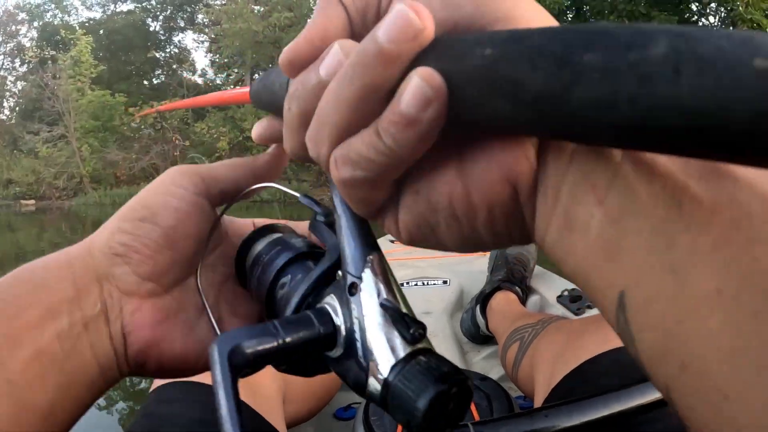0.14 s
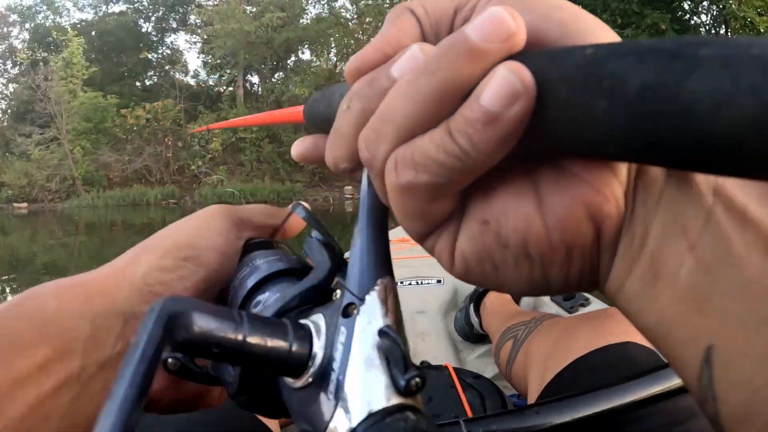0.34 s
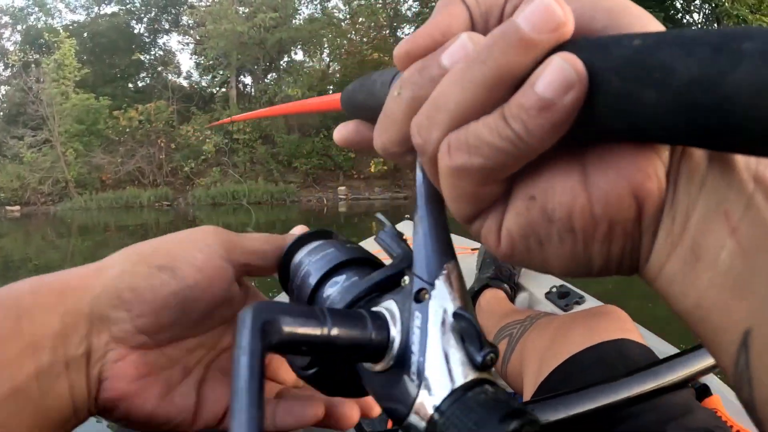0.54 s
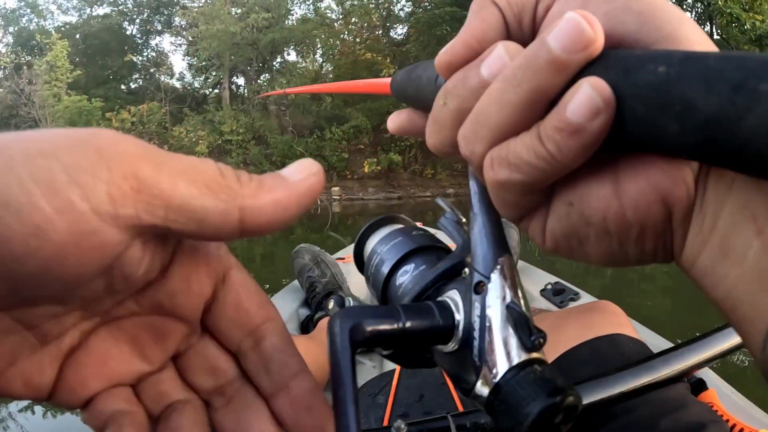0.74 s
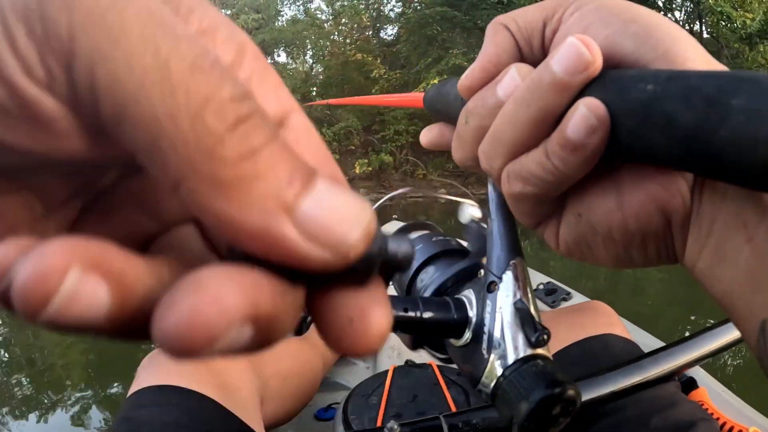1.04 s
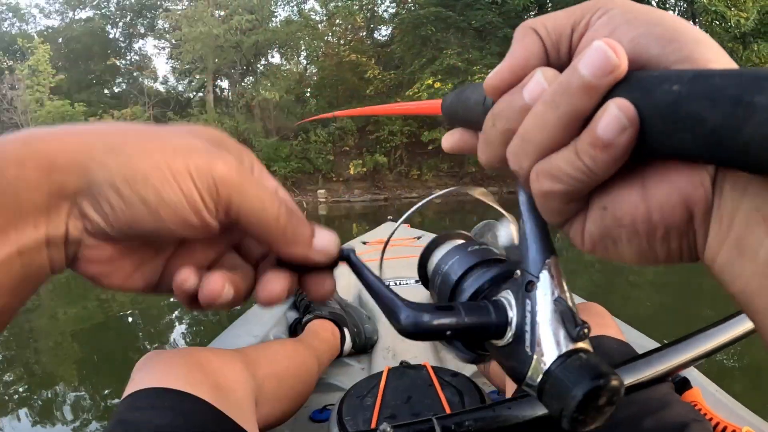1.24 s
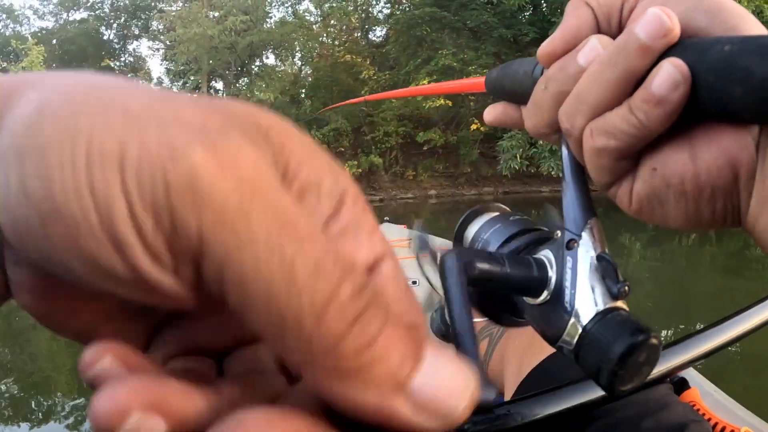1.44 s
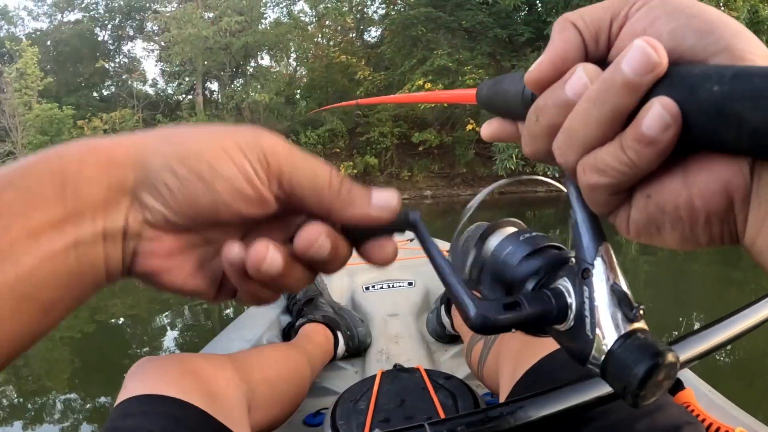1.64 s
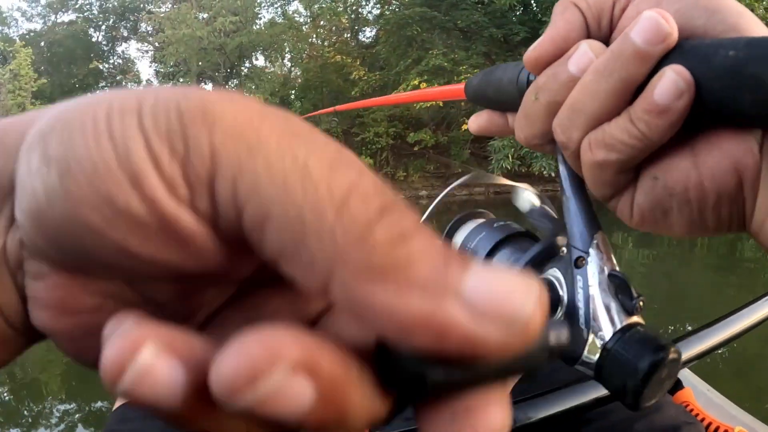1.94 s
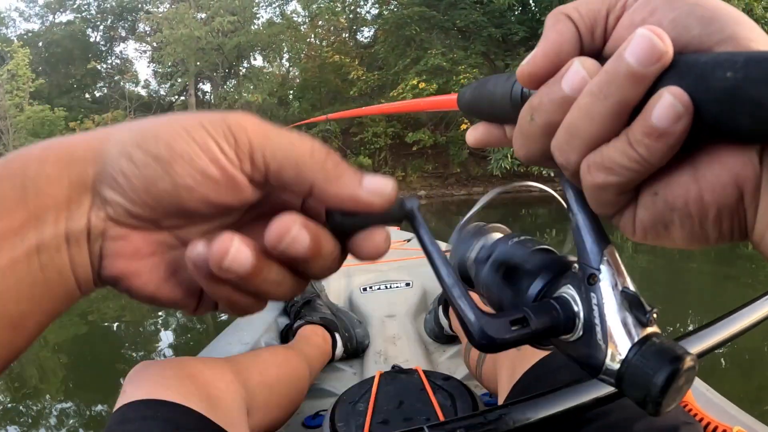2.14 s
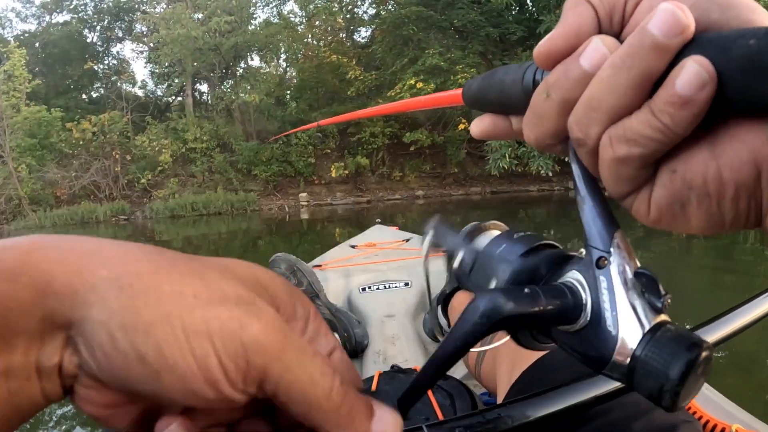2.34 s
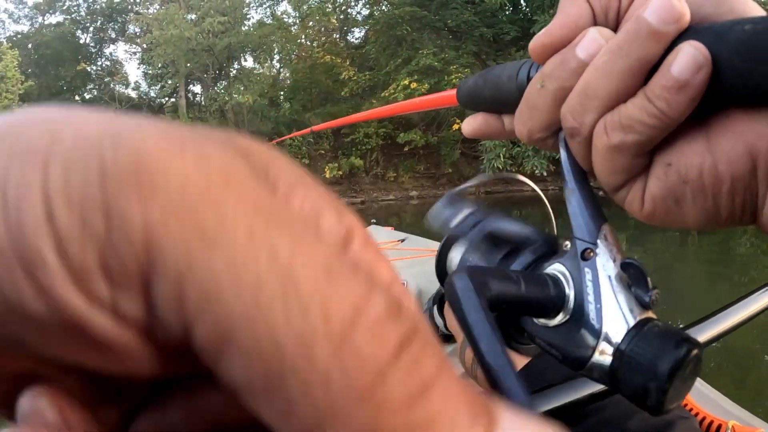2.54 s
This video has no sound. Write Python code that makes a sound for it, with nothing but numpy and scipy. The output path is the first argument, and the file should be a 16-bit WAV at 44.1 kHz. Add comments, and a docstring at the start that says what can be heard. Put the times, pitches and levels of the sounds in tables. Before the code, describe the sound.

A small fishing reel, close up outdoors on a little boat: a cluster of sharp clicks as the bail flips shut, a short lull, then soft gear whirring in uneven turns over low handling rumble.

```python
"""A spinning reel close by on a small boat: a hand flips the wire bail shut, then cranks the handle.
Faint air (stereo noise) lasts throughout; an insect (pulses of narrow noise) chirps at the start.
Then contacts set the modes of the reel clicking, and soft thuds set those of the hull ringing.
Later the gears (dense random touches on resonances) whir and rub in uneven swells.
Handling, as low noise of changing level, thrums and rumbles from beginning to end."""
import sys
import numpy as np
from scipy import signal
from scipy.fft import rfft, irfft
from scipy.io import wavfile

SR = 44100
rng = np.random.default_rng(int(sys.argv[2]) if len(sys.argv) > 2 else 0)


def master(y):
    """Save y as 16-bit WAV."""
    cut = np.clip(np.atleast_2d(y).T, -1, 1)
    pcm = np.round(cut * 32767)  # scale
    wavfile.write(sys.argv[1], SR, pcm.astype(np.int16))


def field_ratio(decibels):
    """Amplitude ratio for a level in dB (20 dB per decade); scalars and array-likes work."""
    return 10 ** (np.asarray(decibels, dtype=float) / 20)


N = 119070   # samples, 2.7 s

# Spectra of the air: (frequency [Hz], relative density [dB per Hz]), (frequency [Hz], left-right [dB]),
# (frequency [Hz], left-right correlation [0..1])
AIR_SPECTRUM = [(300, -5.5), (412, -17), (486, -7.5), (713, -66), (946, -1.5), (1340, -40), (1580, -20),
                (1840, -26.5), (3950, -29.5), (10700, -21), (14700, -20.5)]
AIR_BALANCE = [(300, 0), (3000, 0.5), (12000, 4.5)]
AIR_CORRELATION = [(300, 0.26), (3000, 0.16), (12000, 0.52)]
AIR_RMS_DB = -52

# Insect pulses: (time [s], level [dB])
INSECT_PULSES = [(.024, -56), (.06, -60), (.104, -58.5), (0.136, -54)]
# pitch, standard deviation of the bell-shaped pulse, decay time by 60 dB
CHIRP_HZ, CHIRP_WIDTH_S, CHIRP_T60_S = 3000, 0.008, 0.015

# Handling of the boat and camera: (time [s], hull thrum level [dB], deep rumble level [dB])
HANDLING_LEVELS = [(0,-53.5,-41.5),(.16,-47.5,-49),(.22,-36,-43.5),(.44,-45.5,-46),(.5,-41,-50),(.6,-44,-36.5),(.68,-45.5,-48.5),(.8,-50,-52.5),(.9,-58,-51),(.99,-49,-46.5),(1.1,-50,-46),(1.33,-49,-52),
                   (1.46,-38,-48),(1.57,-41.5,-46.5),(1.65,-44,-38),(1.82,-42.5,-39),(1.9,-43.5,-41.5),(2.04,-49.5,-49),(2.25,-51,-45),(2.33,-50.5,-52.5),(2.42,-49,-50),(2.55,-47,-58),(2.7,-45,-42.5)]
# Spectra of both noises: (frequency [Hz], relative density [dB per Hz])
THRUM_SPECTRUM = [(53, -36), (90, -24), (108, -6.5), (177, 5.5), (396, -15), (450, -15.5), (484, -14.5),
                  (800, -20)]
RUMBLE_SPECTRUM = [(8.8, -29), (15, 8.5), (110, -8)]
# Stereo of both noises: (frequency [Hz], left-right correlation [0..1]), (frequency [Hz], left-right [dB])
HULL_CORRELATION = [(30, 0.95), (150, 0.89), (500, 0.66)]
HULL_BALANCE = [(30, 0.11), (200, -1.7)]

# Thuds passed on to the hull: (time [s], relative level [dB], centre frequency [Hz])
HULL_THUDS = [(0.202, -25.5, 132), (.378, -24.5, 327), (0.512, -21, 170), (0.548, -19, 144.5),
              (0.587, -30.5, 470), (.597, -28, 113), (0.979, -26.5, 127), (.977, -34.5, 444),
              (1.425, -34, 460), (1.454, -25, 370), (1.64, -29.5, 245), (1.8, -28.5, 202)]
# Modes of the hull: (frequency [Hz], relative level [dB], decay time by 60 dB [s])
HULL_MODES = [(94.5, 7.5, 0.057), (170, -4.5, 0.07), (260, -3, 0.03), (370, 3.5, 0.023), (509, -1, 0.055),
              (606, 2.5, 0.081)]
THUD_OCTAVES, THUD_SMOOTHING_S = 0.32, 0.00032   # spread over the modes; time constant

# Modes of the reel: (frequency [Hz], relative level [dB], decay time by 60 dB [s])
REEL_MODES = [(1060, 9, 0.027), (1269.7, 3, 0.021), (1526, 7, 0.021), (1700, 6, 0.012), (1930, 6.5, 0.019),
              (2194, 3, 0.017), (2828, 3.5, 0.0053), (3354, -5.5, 0.0076), (3860, -3.5, 0.0048),
              (4580, -0.5, 0.0056), (4900, 0.5, 0.0091), (5570, 1.5, 0.0073), (6300, 11.5, 0.0018),
              (7180, 3, 0.0043), (8870, 2, 0.0017), (10210, 1, 0.014), (12100, 16.5, 0.0011)]
# Contacts on the reel: (time [s], relative knock level [dB], knock centre [Hz],
# relative tick level [dB], tick centre [Hz])
REEL_CONTACTS = [(0.2499,-33,1450,-23,7040),(0.253,-28.5,1230,-34.5,5040),(0.262,-26,1360,-58,5820),
                 (.304,-27.5,1550,-37.5,6740),(0.333,-32.5,1180,-32.5,3900),(0.3751,-6.5,1395,-33,4200),(0.3781,-37,1360,-13,5070),(0.3797,-39,1500,-15,3460),(0.4301,-5.5,1680,-24.5,5540),(0.462,-25,1530,-50,4750),
                 (0.508,-11,1470,-21.5,3200),(.519,-42.5,1500,-25,3660),(0.532,-27,1470,-48,4840),(0.5428,-11.5,1580,-23,6000),(0.5445,-22,1430,-18.5,6400),(0.549,-22,1700,-20,4200),
                 (0.587,-13.5,1000,-24.5,2850),(.591,-48,1900,-21.5,3000),(0.5931,-20,1140,-24.5,5000),(0.5966,-24,1060,-19,6150),(0.6654,-43,1810,-37.5,5500),
                 (0.686,-17,1494,-14.5,5400),(0.691,-18.5,1440,-33,2400),(0.967,-27,1210,-32,4200),(0.9756,-16.5,1850,-24.5,4650),(0.978,-25,1160,-29.5,3000),(1.031,-30.5,1480,-49,5460),(1.061,-42.5,1150,-38,3500),
                 (1.356,-62,1600,-30,3970),(1.426,-27,1310,-38,3600),(1.446,-27,1310,-38,4700),(1.454,-27,1230,-36,3000),(1.477,-23,1700,-38,3900),(1.498,-33,1740,-32,3640),
                 (1.531,-35,1690,-37.5,4250),(1.71,-37,1370,-31.5,3740),(1.796,-23,1300,-33.5,3750),(1.868,-40,1950,-40,4400),
                 (2.186,-24.5,1360,-40.5,4400),(2.395,-26,1340,-51,4270),(2.43,-19,1470,-33,4670),(2.445,-46,1570,-36.5,4830),(2.461,-23.5,1370,-64,3860)]
KNOCK_OCTAVES, TICK_OCTAVES = 0.2, 0.44   # spread of a contact over the modes
KNOCK_GAIN_DB, TICK_GAIN_DB = -7.5, -2
BURST_S = 0.0012   # longest burst of touches in a tick

# Gear whir in the body: (time [s], level [dB], singing pitch [Hz])
WHIR_COURSE = [(0,-57,1400),(.17,-65,1290),(.3,-56.5,1460),(.45,-46.5,1530),(.55,-43.5,1530),(.7,-47.5,1530),(.76,-70,1330),(.95,-57,1530),(1.0,-54,1380),(1.15,-58.5,1320),(1.3,-52.5,1407),
               (1.46,-38.5,1300),(1.58,-47.5,1300),(1.75,-43.5,1300),(1.85,-45.5,1230),(1.92,-38.5,1830),(2.05,-45.5,1590),(2.2,-38,1710),(2.28,-52,1600),(2.4,-35.5,1950),(2.48,-47.5,1720),(2.55,-53.5,1480),(2.7,-49,1230)]
# Bright rub of line and bearings: (time [s], level [dB], centre frequency [Hz])
RUB_COURSE = [(0,-61.5,4840),(.43,-57,5370),(.47,-47.5,5000),(.55,-40.5,5400),(.57,-54.5,5670),(.64,-48,5000),(.71,-44,7300),(.74,-78.5,5950),(.96,-66,5000),(1.01,-53.5,5000),
              (1.07,-55,5000),(1.1,-65.5,5000),(1.3,-56,4470),(1.45,-46,4080),(1.6,-51.5,4000),(1.72,-47.5,3950),(1.77,-54,4300),(1.9,-44,4500),(1.932,-40,4440),(1.94,-30.5,4250),(1.962,-39,4250),(1.975,-48,4230),
              (2.04,-47,4230),(2.12,-52.5,4180),(2.148,-45,4330),(2.156,-33,4480),(2.175,-48.5,4440),(2.218,-52,3720),(2.228,-40.5,3500),(2.27,-58,4860),(2.33,-53,4330),(2.38,-41,4230),(2.5,-47.5,4330),(2.54,-52.5,4460),(2.7,-54,4040)]
# Touches: mean rate, scale of the random sizes, spread over the resonances, ringing by 60 dB in cycles
TEETH_PER_S, TEETH_SIZE_DB, WHIR_OCTAVES, WHIR_CYCLES = 2000, 3.5, 0.34, 24.0
RUB_PER_S, RUB_SIZE_DB, RUB_OCTAVES, RUB_CYCLES = 4000, 3.5, 0.48, 21.0
# broad whir centre; singing of the body modes, in level relative to the broad whir
WHIR_HZ, SING_DB, SING_OCTAVES, SING_CYCLES = 1600, -3, 0.09, 50.0
WHIR_FLUTTER_DB, RUB_FLUTTER_DB, COLOUR_WANDER_DB = 1.3, 2.0, 3.0   # standard deviations
# airy top: centre, level while the rub is at its mean dB, share of the rub's dB swing
SHEEN_HZ, SHEEN_DB, SHEEN_FOLLOWS = 7400, -59.5, 0.5

# Difference of the two ports for the reel: (frequency [Hz], left-right [dB], lead of the left [rad])
PORT_DIFFERENCE = [(1000, -3.5, -0.57), (1820, -4.5, -1.06), (3000, -3.5, -0.58), (5000, -2.5, -0.73),
                   (9900, -1, -0.86)]
# Further balance as the reel moves: (time [s], left-right [dB])
REEL_BALANCE = [(0, 5.5), (.7, 3), (1.3, 3.5), (1.6, 2), (2.7, 2)]
SCATTER_DB = -15   # energy of the scatter relative to the direct path
REEL_LOW_CUT_HZ, TOP_CUT_HZ = 664, 12570


def rms_one(x):
    """Normalisation: a signal divided by its root mean square has rms 1."""
    return x / np.sqrt(np.mean(x ** 2) + 1e-20)


def in_time(rows):
    """Linear interpolation: each column of a time table becomes one value per sample."""
    times, *columns = np.transpose(rows)
    return [np.interp(np.arange(N) / SR, times, column) for column in columns]


def at_hz(points, hz):
    """Logarithmic frequency: a spectrum is interpolated along octaves."""
    table = np.array(points)
    return np.interp(np.log(hz), np.log(table[:, 0]), table[:, 1])


def drift(corner_hz):
    """Low-passed noise: two equal poles leave a slow random course of standard deviation 1."""
    step = 40   # computed once in 40 samples
    r = np.exp(-2 * np.pi * corner_hz * step / SR)
    noise = rng.standard_normal(N // step + 2002)
    slow = signal.lfilter([1], [1, -2 * r, r * r], noise)[2000:]
    slow = rms_one(slow - slow.mean())
    return np.interp(np.arange(N) / step, np.arange(len(slow)), slow)


def ring(clicks, hz, t60):
    """Damped resonance: a unit click starts a decaying sine of initial height 1."""
    r = field_ratio(-60 / (t60 * SR))
    w = 2 * np.pi * hz / SR
    return signal.lfilter([0, np.sin(w)], [1, -2 * r * np.cos(w), r * r], clicks + 1e-18)


def near(hz, centre_hz, octaves):
    """Selective excitation: a mode's share falls as a bell curve in octaves from the push's centre."""
    return np.exp(-0.5 * (np.log2(hz / centre_hz) / octaves) ** 2)


def sides(lr_db):
    """Level difference: half is added on the left and half taken off on the right, as gains."""
    return field_ratio(np.array([lr_db / 2, -lr_db / 2]))


def banded_noise(spectrum, correlation, balance, edges, flicker_db):
    """Subband synthesis: flickering bands of partly correlated stereo noise add up, at rms 1."""
    out = 0
    white = rng.standard_normal((2, 2, N))   # neighbouring bands use different noise
    for k, (low, high) in enumerate(zip(edges, edges[1:])):
        band = signal.butter(2, [low, high], "band", fs=SR, output="sos")
        mid, side = signal.sosfilt(band, white[k % 2])
        hz = np.sqrt(low * high)
        c = np.clip(at_hz(correlation, hz), 0, 1)
        stereo = np.sqrt(1 + c) * mid + np.sqrt(1 - c) * side * [[1], [-1]]
        gain = field_ratio(at_hz(spectrum, hz) + flicker_db * drift(8.2))
        out = out + gain * sides(at_hz(balance, hz))[:, None] * stereo
    return rms_one(out)


def air():
    """Broadband noise: faint air is a nearly steady, weakly correlated stereo hiss."""
    edges = np.geomspace(300, 16500, num=19)
    return field_ratio(AIR_RMS_DB) * banded_noise(AIR_SPECTRUM, AIR_CORRELATION, AIR_BALANCE, edges, flicker_db=0.4)


def insect():
    """Amplitude modulation: bell-shaped pulses gate noise narrowed by one resonance."""
    t = np.arange(N) / SR
    tone = rms_one(ring(rng.standard_normal(N), CHIRP_HZ, CHIRP_T60_S))
    pulses = sum(field_ratio(db) * np.exp(-0.5 * ((t - s) / CHIRP_WIDTH_S) ** 2) for s, db in INSECT_PULSES)
    return tone * pulses


def handling():
    """Structure-borne noise: movements thrum in the hull and rumble in the camera mount."""
    thrum_db, rumble_db = in_time(HANDLING_LEVELS)
    thrum_edges, rumble_edges = np.geomspace(90, 800, num=11), np.geomspace(15, 110, num=6)
    thrum = banded_noise(THRUM_SPECTRUM, HULL_CORRELATION, HULL_BALANCE, thrum_edges, flicker_db=3.0)
    rumble = banded_noise(RUMBLE_SPECTRUM, HULL_CORRELATION, HULL_BALANCE, rumble_edges, flicker_db=2.0)
    return field_ratio(thrum_db) * thrum + field_ratio(rumble_db) * rumble


def thuds():
    """Modal excitation: pushes smoothed by a one-pole low-pass set the hull modes ringing."""
    s, db, centre_hz = np.transpose(HULL_THUDS)
    out = 0
    for k, (hz, mode_db, t60) in enumerate(HULL_MODES):
        clicks = np.zeros(N)
        clicks[(s * SR).astype(int)] = field_ratio(db + mode_db) * near(hz, centre_hz, THUD_OCTAVES)
        out = out + (-1) ** k * ring(clicks, hz, t60)   # modes alternate in sign
    r = np.exp(-1 / (THUD_SMOOTHING_S * SR))
    return signal.lfilter([1 - r], [1, -r], out)


def contacts():
    """Modal impact: one knock drives modes near its centre, three quick touches tick others."""
    s, knock_db, knock_hz, tick_db, tick_hz = np.transpose(REEL_CONTACTS)
    out = 0
    chance = rng.random((len(s), 3 * len(REEL_MODES)))
    for k, (hz, db, t60) in enumerate(REEL_MODES):
        clicks = np.zeros(N)
        knock = field_ratio(knock_db + KNOCK_GAIN_DB + db) * near(hz, knock_hz, KNOCK_OCTAVES)
        tick = field_ratio(tick_db + TICK_GAIN_DB + db) * near(hz, tick_hz, TICK_OCTAVES)
        clicks[(s * SR).astype(int)] += knock
        for j in range(3):
            delay = BURST_S * j / 2 * chance[:, 3 * k + j]
            clicks[((s + delay) * SR).astype(int)] += tick
        out = out + (-1) ** k * ring(clicks, hz, t60)   # modes alternate in sign
    return out


def grains(per_s, size_db, centre_hz, octaves, pitches, cycles):
    """Random impulse excitation: touches ring resonances near a centre, with the level evened out."""
    sizes = field_ratio(size_db * np.minimum(rng.exponential(1, N), 4))
    touches = sizes * (rng.random(N) < per_s / SR)
    out, power = 0, 1e-9
    for hz in pitches:
        share = near(hz, centre_hz, octaves) * field_ratio(COLOUR_WANDER_DB * drift(3.6))
        push = touches * share * rng.uniform(-0.98, 1, N)
        soft = ring(push, hz, cycles / hz / 2) * hz / SR   # a first resonance softens the onset
        out = out + ring(soft, hz, cycles / hz)
        power = power + share ** 2 / hz
    return rms_one(out / np.sqrt(power))


def gears():
    """Frictional excitation: gear teeth whir in the body; line and bearings rub brighter."""
    whir_db, sing_hz = in_time(WHIR_COURSE)
    rub_db, rub_hz = in_time(RUB_COURSE)
    flutter = drift(25.0)   # shared by whir and rub
    modes = np.array(REEL_MODES)[:, 0]
    body, top = np.geomspace(1000, 2350, num=14), np.geomspace(6000, 13000, num=10)
    whir = grains(TEETH_PER_S, TEETH_SIZE_DB, WHIR_HZ, WHIR_OCTAVES, body, WHIR_CYCLES)
    sing = grains(TEETH_PER_S, TEETH_SIZE_DB, sing_hz, SING_OCTAVES, modes[:6], SING_CYCLES)
    whir = whir + field_ratio(SING_DB) * sing
    rub = grains(RUB_PER_S, RUB_SIZE_DB, rub_hz, RUB_OCTAVES, modes[5:15], RUB_CYCLES)
    sheen = grains(RUB_PER_S, RUB_SIZE_DB, SHEEN_HZ, RUB_OCTAVES, top, RUB_CYCLES)
    sheen_db = SHEEN_DB + SHEEN_FOLLOWS * (rub_db - rub_db.mean())
    out = field_ratio(sheen_db) * sheen
    out = out + field_ratio(whir_db + WHIR_FLUTTER_DB * flutter) * whir
    return out + field_ratio(rub_db + RUB_FLUTTER_DB * flutter) * rub


def ports(x):
    """Interchannel difference: level and phase differ by pitch, and each port has its own scatter."""
    low_cut = signal.butter(4, REEL_LOW_CUT_HZ, "high", fs=SR, output="sos")
    spectrum = rfft(signal.sosfilt(low_cut, x))
    hz, lr_db, lead = np.transpose(PORT_DIFFERENCE)
    f = np.log(np.arange(N // 2 + 1) * SR / N + 1)
    turn = np.exp(0.5j * np.interp(f, np.log(hz), lead) * np.array([[1], [-1]]))
    direct = irfft(spectrum * sides(np.interp(f, np.log(hz), lr_db)) * turn, N)
    scatter = rng.standard_normal((2, 400)) * np.exp(-np.arange(400) / (0.002 * SR))   # decays over 2 ms
    scatter /= np.sqrt((scatter ** 2).sum(axis=1, keepdims=True))
    scattered = signal.fftconvolve(direct, scatter, axes=1)[:, :N]
    return sides(in_time(REEL_BALANCE)[0]) * (direct + field_ratio(SCATTER_DB) * scattered)


def scene():
    """Superposition: the pressures of air, insect, hull and reel add up."""
    return air() + insect() + handling() + thuds() + ports(contacts() + gears())


def low_pass(x):
    """Removes everything above the highest recorded frequency."""
    return signal.sosfilt(signal.butter(12, 16480, fs=SR, output="sos"), x)


def record(dry):
    """Low-pass filtering: an eighth-order slope cuts the top of the mix steeply."""
    top_cut = signal.butter(8, TOP_CUT_HZ, fs=SR, output="sos")
    mix = signal.sosfilt(top_cut, dry)
    return low_pass(mix)


dry = scene()
out = record(dry)
master(out)
```